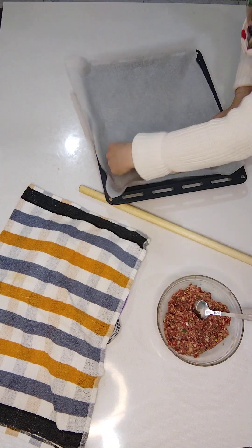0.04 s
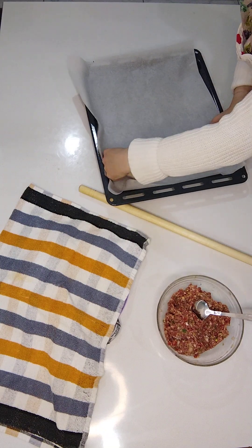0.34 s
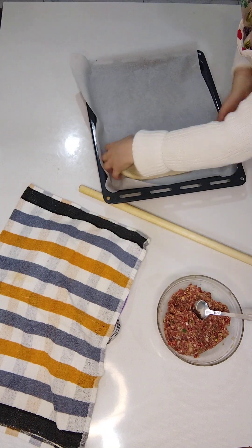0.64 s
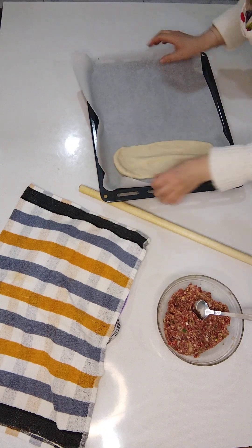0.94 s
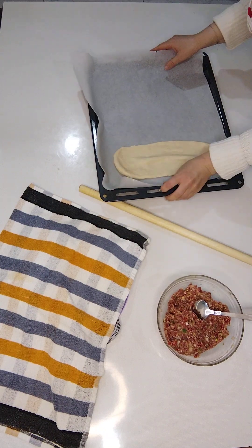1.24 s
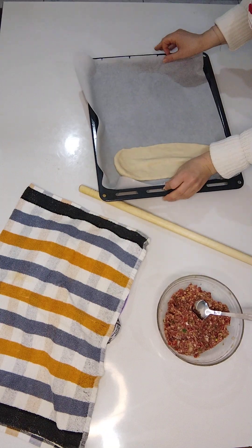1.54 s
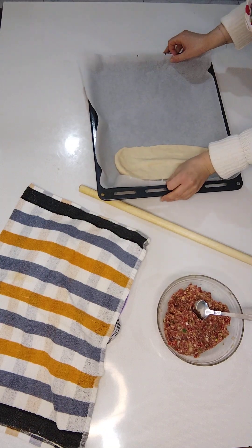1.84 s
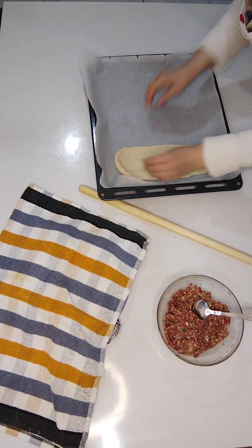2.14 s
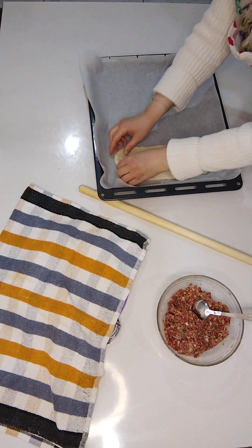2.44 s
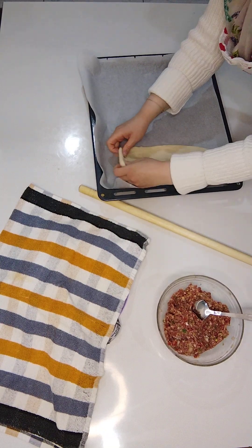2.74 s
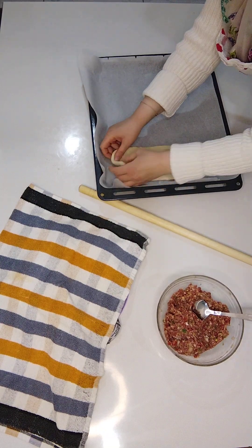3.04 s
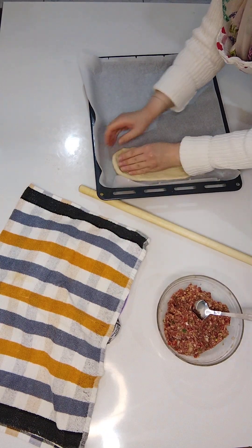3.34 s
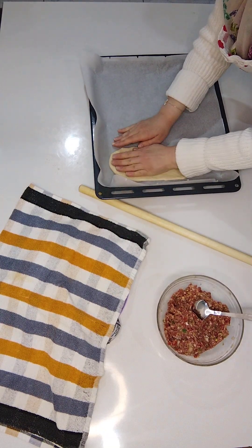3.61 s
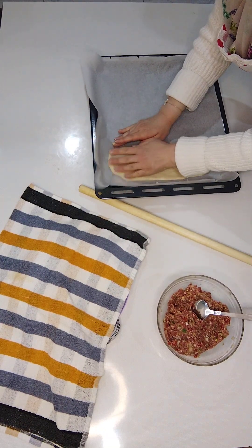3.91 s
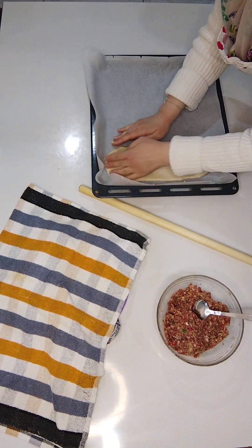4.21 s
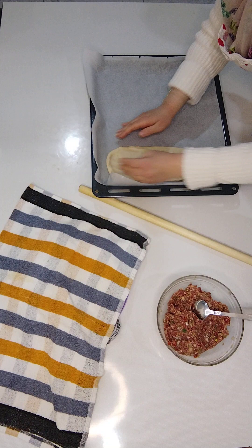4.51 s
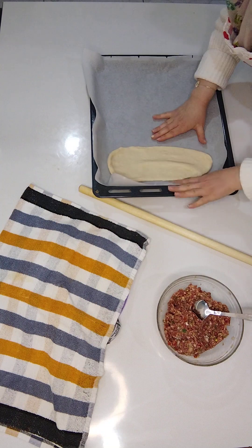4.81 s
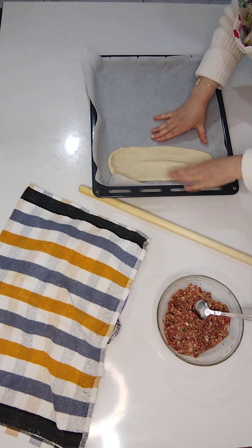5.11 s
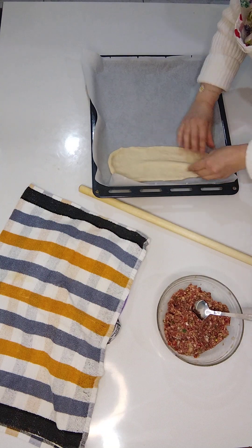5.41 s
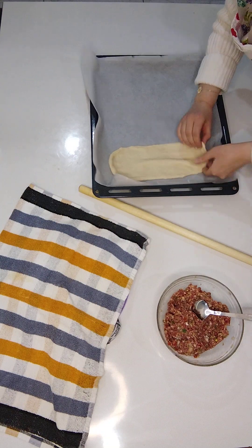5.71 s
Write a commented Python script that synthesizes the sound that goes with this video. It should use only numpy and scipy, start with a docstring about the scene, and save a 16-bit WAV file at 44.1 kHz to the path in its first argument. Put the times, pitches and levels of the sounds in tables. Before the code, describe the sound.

A metal baking tray gives one soft, low boom as dough is set down. Then baking paper rustles and crinkles in short, uneven strokes while hands shape the dough, with small sharp snaps where creases buckle. The loudest crinkling comes about two thirds through. The paper is close to the stereo microphones, slightly left, in a hard-walled kitchen with a faint appliance hum.

```python
"""A hard-walled kitchen, stereo microphones close to a metal tray where hands shape dough on baking paper.
Each shift of the sheet is a swarm of tiny fibre slips, with sharper snaps where a crease buckles.
The tray booms once at the start, as the dough is set down. Worktop and walls throw the paper's
sound back, over the low hum of an appliance."""
import sys
import numpy as np
from scipy import signal
from scipy.fft import rfft, irfft
from scipy.io import wavfile
from scipy.ndimage import uniform_filter1d

SR = 44100
rng = np.random.default_rng(int(sys.argv[2]) if len(sys.argv) > 2 else 0)


def waveform_to_disk(signal):
    """Save audio, clipped to [-1, 1], as 16-bit WAV at the path in sys.argv[1]."""
    frames = np.transpose(np.atleast_2d(signal))
    scaled = np.clip(frames, -1, 1) * 32767
    samples = np.round(scaled).astype(np.int16)
    wavfile.write(sys.argv[1], SR, samples)


N = 262836

# The paper's three registers, heard close up: f/Hz, spectral level/dB
BODY_SPECTRUM = [(250, -32), (500, -7.5), (800, -4.5), (980, -5), (1150, -1.5), (1320, -3.5), (1500, -0.5),
                 (1800, -2), (2200, -2), (2700, -10), (4500, -54)]
CRINKLE_SPECTRUM = [(900, -43), (1800, -18.5), (2400, -3.5), (3300, 2.5), (4400, 2.5), (5300, -1.5),
                    (6600, -2), (8000, -17.5), (12000, -40.5)]
FIZZ_SPECTRUM = [(3500, -46.5), (6000, -11), (7400, -3.5), (9000, 3), (11500, -1), (12500, 1.5),
                 (15500, -3.5), (17000, -5.5)]
REGISTERS = (BODY_SPECTRUM, CRINKLE_SPECTRUM, FIZZ_SPECTRUM)
# Pushes and slides of the hands on the sheet:
# t/s, rise/s, hold/s, level/dB, fade/(dB/s), body/dB, fizz/dB, f/Hz of the patch under the hand
HAND_STROKES = [(0.0, 0.0004, 0.0053, -27, 298, -8, 2.5, 2700),
                (0.036, 0.011, 0.036, -41.5, 74, -5.5, -7, 1390),
                (0.25, 0.042, .01, -43.5, 224, -7.5, 1, 3600), (0.417, .005, .02, -54.5, 98, -1.5, 2, 2790),
                (0.491, 0.053, 0.094, -40.5, 360, -9, 1, 2950), (0.944, .005, .04, -50.5, 100, 1, -8, 2870),
                (0.973, 0.042, .005, -46, 200, 1, -3, 1600), (1.117, .005, 0.081, -55.5, 60, -3, -1, 1580),
                (1.355, .005, 0.06, -54, 100, -0.5, -3.5, 2700),
                (1.417, 0.036, 0.14, -49, 128, -5.5, -1.5, 3060),
                (1.63, 0.0059, 0.0059, -53.5, 94, -8, -4.5, 2430),
                (1.804, 0.047, .005, -50.5, 282, -4, -1, 2130),
                (2.189, 0.0044, .06, -55.5, 100, -4, 0, 3400),
                (2.254, 0.0078, 0.022, -49.5, 102, -3.5, 1, 3080),
                (2.346, 0.069, 0.21, -50.5, 100, -6.5, 3.5, 4700),
                (2.523, 0.022, .01, -42.5, 200, -6.5, -3, 4570), (2.619, .05, 0.078, -50, 280, -4, 4, 4540),
                (2.808, 0.0093, 0.036, -47.5, 100, -4, 1.5, 3400),
                (2.846, 0.028, 0.11, -45, 168, -6, -1.5, 2010), (2.993, 0.024, .02, -51, 98, -4.5, 3, 2440),
                (3.077, 0.0082, .12, -51.5, 104, -8, 4.5, 3300),
                (3.219, 0.032, 0.012, -46.5, 298, -5, -4.5, 2260),
                (3.446, 0.0046, 0.0027, -42, 222, -5, -4, 3000),
                (3.54, .005, 0.08, -55.5, 65, -4, -6.5, 3140),
                (3.829, 0.01, 0.088, -38.5, 200, -3.5, 2, 1400),
                (3.935, 0.026, 0.061, -39, 210, -13.5, 1, 3280),
                (4.206, 0.0034, 0.0033, -46.5, 275, -10, -4, 3300),
                (4.255, 0.032, 0.095, -50, 170, -4.5, 0, 4570),
                (4.643, 0.017, 0.03, -46.5, 204, -6.5, -0.5, 2080),
                (4.684, 0.053, .015, -43, 140, -7.5, 2, 1120),
                (4.936, 0.006, 0.028, -54.5, 109, -13, -1, 4030),
                (5.028, .015, 0.042, -58.5, 250, -4, -9, 3530),
                (5.159, 0.016, .012, -60, 298.5, -4, 2.5, 2000),
                (5.372, 0.037, .008, -52, 157, -4.5, 2, 4770),
                (5.506, 0.019, .003, -43.5, 128, -4, -1.5, 2910),
                (5.602, 0.0047, .02, -39.5, 126, -4, 1, 1640), (5.616, 0.032, .005, -37, 168, -19, 2, 3120),
                (5.75, 0.034, 0.0093, -44, 180, -8.5, 0, 2580),
                (5.864, 0.0054, 0.098, -54, 100, -6, -11, 3800)]


def paper_rustle(trim_db=-3, fizz_left_db=1.9, patch_db=3.5, fade_ratios=(1, 1, 1.37)):
    """Fibres slip under the hands: flexing gives body, sliding gives fizz, rarer slips crackle on top."""
    out = np.zeros((2, N))
    fine = fibre_slips(per_s=4000, spread_db=2, clump_db=2.5, ring_s=0.00053)
    crackle = 0.55 * fibre_slips(per_s=240, spread_db=3.5, clump_db=1.5, ring_s=0.0003)
    swarms = (fine, unit(fine + crackle), unit(fine + 2 * crackle) * pan(fizz_left_db))
    layers = [colour(swarm, spectrum) for swarm, spectrum in zip(swarms, REGISTERS)]
    offsets = rng.integers(0, N - SR, len(HAND_STROKES))
    for (start, rise, hold, level, fade, body, fizz, patch_hz), at in zip(HAND_STROKES, offsets):
        gains = amp(level + trim_db + np.array([body, 0, fizz]))
        # as the sheet settles, the fizz dies faster than body and crinkle
        stroke = sum(gain * hand_effort(rise, hold, fade * ratio) * layer[:, at:at + SR]
                     for gain, ratio, layer in zip(gains, fade_ratios, layers))
        add(out, start, paper_patch(stroke, patch_hz, patch_db, q=8.1))
    return out


def fibre_slips(per_s, spread_db, clump_db, ring_s, spots=96, size=96):
    """A swarm of slips of uneven size, in clumps, spread over many spots of the sheet."""
    at = np.flatnonzero(rng.random(N) < per_s / SR)
    strength = amp(spread_db * np.minimum(rng.exponential(1, N), 4) + clump_db * drift(80))[at]
    spot = rng.integers(0, spots, N)[at]
    # from each spot a bending wave dies in the sheet and reaches each microphone differently
    waves = rng.standard_normal((2, spots, size)) * np.exp(-np.arange(size) / SR / ring_s)
    slips = waves[:, spot] * strength[:, None]
    where = (at[:, None] + np.arange(size)).ravel()
    return unit(np.array([np.bincount(where, side.ravel(), N)[:N] for side in slips]))


def hand_effort(rise, hold, fade_db_per_s, catch_db=-8, sag_db_per_s=29.5):
    """Gain of one stroke: it catches, swells, eases off while held, then the sheet settles."""
    t = np.arange(SR) / SR
    swell_db = catch_db * np.maximum(1 - t / rise, 0)
    held = np.clip(t - rise, 0, hold)
    released = np.maximum(t - rise - hold, 0)
    return amp(swell_db - sag_db_per_s * held - fade_db_per_s * released)


def paper_patch(x, hz, db, q=5):
    """The patch of paper beside a crease or under a hand colours the sound at its own pitch."""
    b, a = signal.iirpeak(hz, q, SR)
    return (x + (amp(db) - 1) * signal.lfilter(b, a, x)) / amp(db / 4)


# Creases buckling close to the microphones:
# t/s, level/dB over 6 ms, length/s, body/dB, fizz/dB, left over right/dB, patch f/Hz, patch gain/dB
CREASES = [(0.1396, -42, 0.0014, -14, -6, 0, 3870, 5), (0.244, -46, 0.00081, -18, 0, 2, 8300, 4),
           (0.268, -43.5, .0027, -30, 1, 1, 12200, 9), (0.425, -41.5, 0.0015, -32, 0, -1, 2830, 11),
           (0.43, -49, .0017, -27, -2, 6, 2820, 7), (0.4812, -43, .0024, -16, 2.5, -1, 3000, 11),
           (0.51, -41, 0.0023, -12.5, 1, 0, 3000, -3), (0.556, -35, .003, -11, 3, 2, 3000, 10.5),
           (0.869, -56.5, 0.0016, -16, -6, 1, 3000, 2), (0.9414, -39.5, .001, -8, 3.5, 2, 7800, 3.5),
           (1.02, -39, 0.0021, -13, -3, 3, 1900, -1), (1.1013, -47, 0.0016, -24, 7, 8, 7900, 13),
           (1.116, -39.5, 0.0031, -7.5, -0.5, 4, 2100, 1.5), (1.1741, -41.5, .0011, -23, 26, 3, 8500, -1),
           (1.3536, -45.5, 0.0029, -4.5, -8, -1, 1700, 6), (1.4491, -44.5, 0.0051, -11, -8, -1, 1110, 14),
           (1.5624, -45, 0.00058, -24, 5, 5, 9400, 2), (1.6429, -49, 0.0023, -8, -12, 6, 1500, 4),
           (1.854, -44, 0.0048, -8.5, -7, -1, 2600, 5), (1.9844, -32, 0.0037, -12, 4, 3, 5040, 8.5),
           (2.2692, -37, .003, -10, -1, 1, 1290, 7), (2.329, -41.5, 0.0011, -27, 6.5, 5, 12000, 2),
           (2.408, -47, .0026, -27, -7, 2, 3720, 7.5), (2.45, -44.5, 0.0012, -18, 11, 1, 13400, 8),
           (2.4914, -39, 0.001, -8.5, 3, 3, 15500, 11), (2.507, -41.5, 0.00067, -7, -0.5, 1, 6000, 4),
           (2.5535, -36.5, 0.003, -14, 9, 4, 6400, 2), (2.557, -33.5, .0016, -29, 4.5, 4, 6200, 8),
           (2.7447, -41.5, 0.00048, -10, 2, 0, 4400, 5.5), (2.8173, -47, 0.0051, -8, 8, 8, 6700, 7),
           (2.933, -35, 0.0024, -11, 7, 1, 8700, -2), (3.458, -41, 0.003, -10.5, -2, 0, 2500, 1),
           (3.541, -44.5, 0.0013, -22, 1, 7, 1900, 10), (3.8134, -41.5, 0.0048, -20, 6, 4.5, 9600, 1),
           (3.834, -36.5, 0.003, -14, -2.5, 7, 8500, 9), (3.862, -43.5, 0.0023, -13, -7, 6, 2500, 16),
           (3.8767, -41.5, .0007, -5, -5, 10, 1320, 11), (3.8867, -28, 0.0033, -17, 9, 6.5, 11700, 1),
           (3.9152, -34.5, 0.00096, -9, 8.5, 0, 2300, 20), (3.95, -38, .0018, -18, 11, 7, 15500, 4),
           (3.9658, -32.5, 0.00076, -21, 10, 4, 3150, 14), (3.979, -38, 0.00097, -19, 14, 5, 8100, -4),
           (4.0236, -32, 0.0048, -14, 0, 0, 4380, 2.5), (4.0572, -41, 0.0013, -20, 5, 12, 8500, 3),
           (4.2137, -45, 0.0025, -10, 9, 7, 8500, 2), (4.285, -40.5, 0.00094, -13, 0, 2, 15500, 7),
           (4.72, -37.5, 0.002, 2, 14.5, 6, 8500, 1), (4.741, -41, 0.0031, -24, -4, 12, 8100, 8),
           (4.9506, -43, 0.0025, -9.5, 4, 2, 2000, 6), (5.405, -41, 0.0023, -19, 6.5, 3, 4600, 11),
           (5.5145, -40.5, 0.0028, -20, 3, 3, 3200, 4), (5.606, -34, 0.0028, -3.5, 4, 5, 1640, 9),
           (5.623, -39, .0027, -15, -1, 0, 3000, 0), (5.648, -33, .0026, -7, -3, 1, 3830, 2),
           (5.863, -47, 0.0019, -17, -11, 5, 4900, 3), (5.881, -40, 0.0017, -9.5, -0.5, -2, 3820, -2)]


def crease_snaps(rings_s=(0.0067, 0.0005, 0.0005), body_db=5, fizz_db=1, room_db=-0.5, size=1024, slips=6):
    """A crease buckles in a quick run of slips; returns the direct sound and what spreads into the room."""
    direct, spread = np.zeros((2, 2, N))
    t, order = np.arange(size) / SR, np.arange(slips)
    responses = [colour(signal.unit_impulse(size)[None], spectrum) for spectrum in REGISTERS]
    for start, level, length, body, fizz, left_db, patch_hz, patch_db in CREASES:
        onsets = (order + rng.random(slips) * (order > 0)) / slips * length
        since = t - onsets[:, None]
        power = rng.uniform(0.17, 1, (slips, 1)) * np.geomspace(1, 0.25, slips)[:, None]
        balance = amp([body + body_db, 0, fizz + fizz_db])
        gains = unit_energy(balance) * amp(level) * np.sqrt(0.006 * SR)
        snap = np.zeros((2, size))
        # each slip leaves a short burst; the sheet's body rings longest
        for gain, response, ring in zip(gains, responses, rings_s):
            envelope = np.sqrt((power * (since >= 0) * np.exp(-2 * abs(since) / ring)).sum(0))
            burst = envelope * rng.standard_normal((2, size))
            snap += gain * unit_energy(signal.fftconvolve(burst, response, axes=1)[:, :size])
        add(direct, start, pan(left_db) * paper_patch(snap, patch_hz, patch_db))
        # summed over all directions, the snap has a smooth spectrum
        all_round = sum(gain * response for gain, response in zip(gains, responses))
        add(spread, start + length / 2, amp(room_db) * paper_patch(all_round, patch_hz, patch_db))
    return direct, spread


# Modes of the tray, alike at both microphones: f/Hz, level/dB, t60/s
TRAY_MODES = [(104.7, -42.5, 0.78), (125.3, -39.5, 0.27), (205.7, -39.5, 0.15), (429, -46, 0.24)]


def tray_boom(strike_s=0.0063, rise_s=0.013):
    """The thin steel floor of the tray booms under the soft push of the dough."""
    t = np.maximum(np.arange(N) / SR - strike_s, 0)
    ring = sum(amp(db - 60 * t / t60) * np.sin(2 * np.pi * hz * t) for hz, db, t60 in TRAY_MODES)
    return ring * (1 - np.exp(-t / rise_s))


# Reverberation between the kitchen's hard walls: f/Hz, t60/s
WALL_DECAY = [(300, 0.63), (1500, 0.47), (3500, 0.35), (7000, 0.25), (11000, 0.27), (16000, 0.18)]


def kitchen_echoes(x, tail_db=-1.5, near_db=-6, near_s=0.0022, gap_s=0.0045, size=22050, paths=3):
    """Quick echoes off tray and worktop, then the diffuse tail; the paths change as the hands move."""
    t, out = np.arange(size) / SR, np.zeros((2, N))
    active = np.arange(N) // 700 % paths  # the echo patterns take turns, 16 ms each
    for path in range(paths):
        taps = rng.choice([-1., 1.], (2, size)) * (rng.random((2, size)) < 9000 / SR)
        hz, when, bands = signal.stft(taps * (t > gap_s), SR, nperseg=256)
        decay = amp(-60 * when / read(WALL_DECAY, hz)[:, None])
        tail = signal.istft(bands * decay, SR, nperseg=256)[1][:, :size]
        near = taps[::-1] * np.exp(-t / near_s) * (t > 0.001)
        echoes = amp(tail_db) * unit_energy(tail) + amp(near_db) * unit_energy(near)
        crossfade = np.sqrt(abs(uniform_filter1d((active == path) * 1., size=200)))
        out += signal.fftconvolve(x * crossfade, echoes, axes=1)[:, :N]
    return out


# The appliance's strongest tone, swelling and sinking behind the paper: t/s, level/dB
DRONE_SWELL = [(0.0, -64), (0.2, -66), (0.65, -57), (1.85, -61.5), (2.2, -56.5), (2.75, -54.5), (3.35, -60),
               (4.45, -61.5), (4.95, -55), (5.3, -62), (5.96, -55)]
# Its weaker tones: f/Hz, level/dB
HUM_TONES = [(80.7, -71), (106, -67), (214.5, -60.5), (253, -65), (281, -66), (355, -65), (439, -71.5),
             (500.6, -71.5), (716, -68.5), (791.3, -68.5)]


def appliance_hum(drone_hz=152, drone_trim_db=-1.66, hum_trim_db=-1.5):
    """An appliance in the background gives a slowly swelling drone and weaker wavering tones."""
    t = np.arange(N) / SR

    def tone(hz, depth):
        """A sine that sways in level and phase, faster the higher it is."""
        sway_hz = 7 + 0.0045 * hz
        angle = 2 * np.pi * (hz * t + rng.random())
        return unit((1 + depth * drift(sway_hz)) * np.cos(angle) + depth * drift(sway_hz) * np.sin(angle))

    swell_db = np.interp(t, *np.transpose(DRONE_SWELL))
    drone = amp(swell_db + drone_trim_db) * tone(drone_hz, depth=0.26)
    return drone + sum(amp(db + hum_trim_db) * tone(hz, depth=0.62) for hz, db in HUM_TONES)


# Room tone, the air noise of appliance and kitchen: f/Hz, spectral level/dB
AIR_SPECTRUM = [(25, -28), (45, -20), (75, -8.5), (120, -0.5), (220, 0.5), (320, -0.5), (450, -5.5),
                (620, -6), (820, -7.5), (950, -14.5), (1600, -19.5), (4000, -29), (8000, -36),
                (16000, -35.5)]
# Its likeness at the two microphones: f/Hz, coherence/(0-1)
AIR_COHERENCE = [(60, 0.6), (170, 0.77), (280, 0.72), (500, 0.54), (1000, 0), (16000, 0.1)]


def room_air(level_db=-55):
    """A dull rush of air, much alike at both microphones in the bass and wide in the treble."""
    hz = np.fft.rfftfreq(N, 1 / SR)
    left, other = rfft(rng.standard_normal((2, N)))
    same = read(AIR_COHERENCE, hz)
    right = same * left + np.sqrt(1 - same ** 2) * other
    air = irfft(np.array([left, right]) * amp(read(AIR_SPECTRUM, hz)), N)
    return amp(level_db) * unit(air)


def amp(db):
    """Decibels to gain."""
    return 10 ** (np.asarray(db) / 20)


def pan(left_db):
    """Stereo gains with the left microphone louder by left_db."""
    return amp([[left_db / 2], [-left_db / 2]])


def unit(x):
    """Scales to rms 1."""
    return x / np.sqrt(np.mean(x ** 2) + 1e-20)


def unit_energy(x):
    """Scales each channel to energy 1."""
    return x / np.linalg.norm(x, axis=-1, keepdims=True)


def read(points, hz):
    """Reads a table on a log-frequency axis."""
    f, value = np.transpose(points)
    return np.interp(np.log(hz + 1), np.log(f + 1), value)


def add(mix, start_s, sound):
    """Adds a sound to the stereo mix at start_s."""
    part = mix[:, round(start_s * SR):][:, :sound.shape[1]]
    part += sound[:, :part.shape[1]]


def drift(rate_hz):
    """Smooth random wander of rms 1."""
    t = np.arange(0, N / SR + 0.01, 0.001)
    hz = np.fft.rfftfreq(len(t), t[1])
    slow = irfft(rfft(rng.standard_normal(len(t))) * np.exp(-(hz / rate_hz) ** 2), len(t))
    return unit(np.interp(np.arange(N) / SR, t, slow))


def colour(x, spectrum, size=1024):
    """Causal filter of unit energy with the given spectrum."""
    log_gain = np.log(amp(read(spectrum, abs(np.fft.fftfreq(size, 1 / SR)))))
    taps = np.fft.ifft(np.exp(np.conj(signal.hilbert(log_gain)))).real[:size // 2]
    return signal.oaconvolve(x, unit_energy(taps)[None], axes=1)[:, :x.shape[1]]


def scene(left_db=-1.04, right_db=-2.0):
    """The paper lies close to the microphones and a little to the left, with the kitchen behind it."""
    rustle = paper_rustle() * amp([[left_db], [right_db]])
    snaps, spread = crease_snaps()
    return rustle + snaps + tray_boom() + kitchen_echoes(rustle + spread) + room_air() + appliance_hum()


def record(dry):
    """The recorder cuts off steeply at about 16 kHz."""
    taps = signal.firwin(511, 16150, window=("kaiser", 9), fs=SR)
    return signal.oaconvolve(dry, taps[None], "same", axes=1)


dry = scene()
out = record(dry)
waveform_to_disk(out)
```